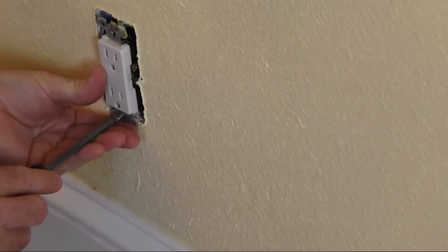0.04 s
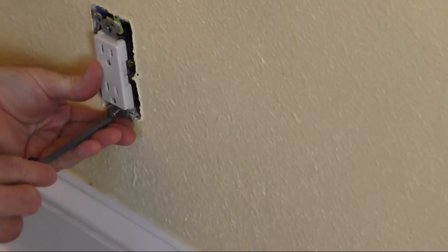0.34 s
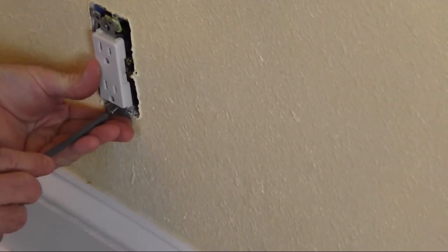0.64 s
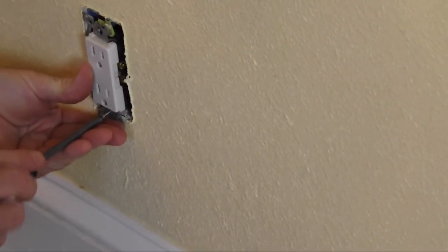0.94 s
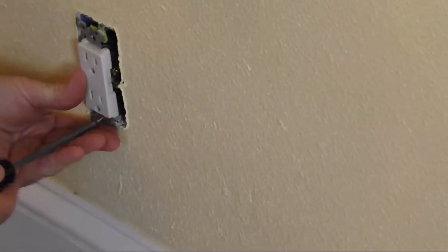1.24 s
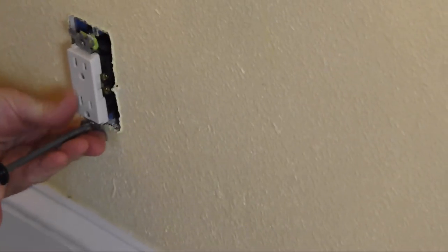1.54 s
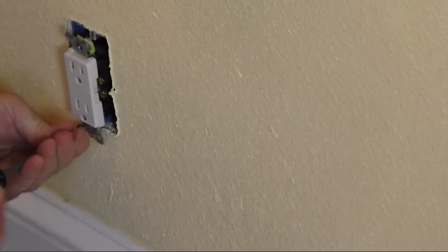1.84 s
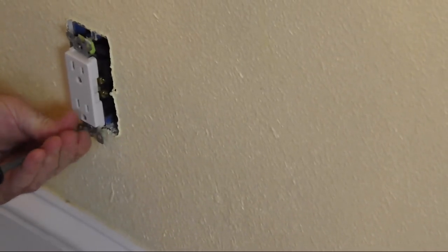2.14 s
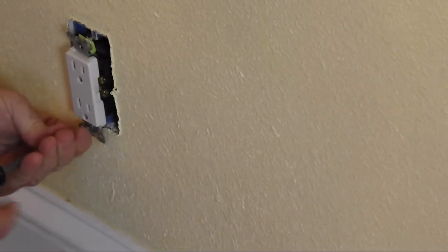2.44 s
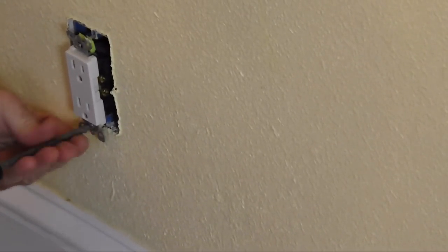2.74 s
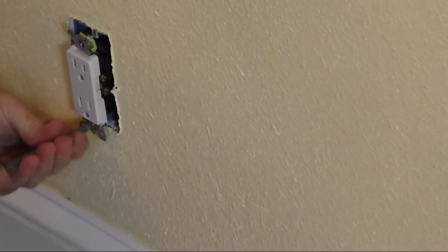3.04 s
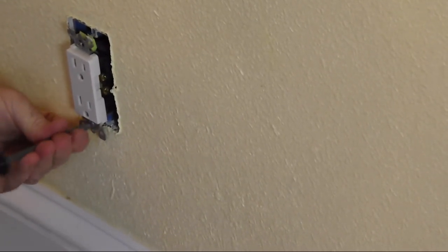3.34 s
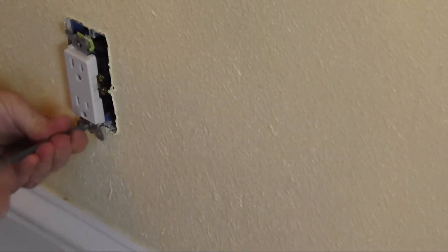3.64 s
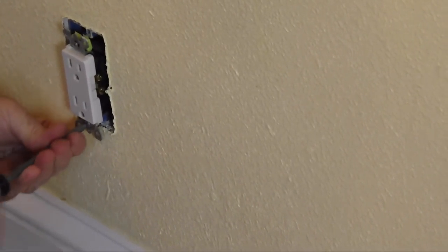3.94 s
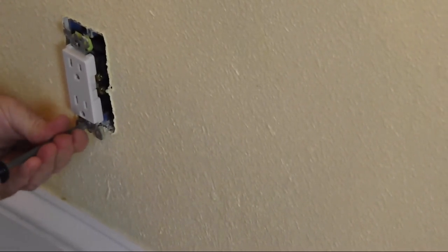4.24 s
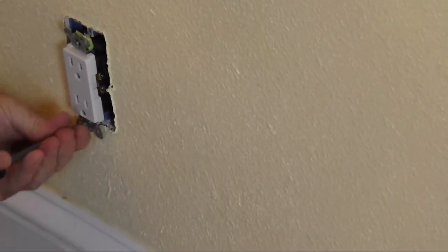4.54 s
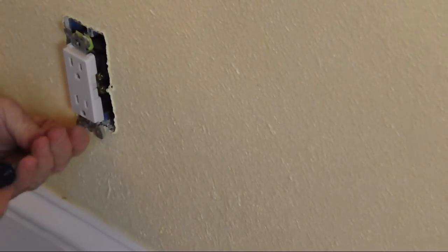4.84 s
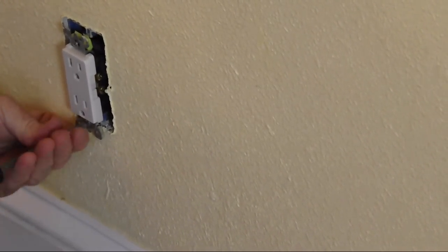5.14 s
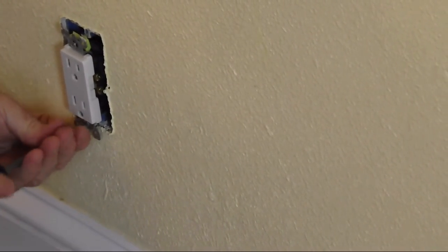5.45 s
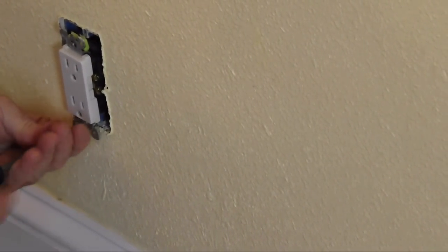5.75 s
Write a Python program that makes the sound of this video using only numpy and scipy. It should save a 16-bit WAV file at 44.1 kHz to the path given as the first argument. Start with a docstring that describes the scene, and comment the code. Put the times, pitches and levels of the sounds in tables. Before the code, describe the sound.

A screwdriver works a wall outlet screw with small clicks, faint scrapes and hollow knocks, then slips with one loud clack.

```python
"""A screwdriver drives the mounting screw of a wall outlet in a small, quiet room.
Room noise and a faint hum run throughout. From the start the loose outlet knocks in its box, the hollow
wall booms behind it and the steel tip clicks in the screw head; each turn scrapes the thread.
At 4.5 s the tool slips hard and jolts the outlet's strap. A few more turns and knocks follow."""
import sys
import numpy as np
from scipy import signal
from scipy.fft import rfft, irfft
from scipy.io import wavfile
from scipy.ndimage import uniform_filter1d

SR = 44100
rng = np.random.default_rng(int(sys.argv[2]) if len(sys.argv) > 2 else 0)


def to_wav(s):
    """Save 16-bit WAV."""
    ch = np.atleast_2d(s).T  # columns
    pcm = np.round(np.clip(ch, -1, 1) * 32767)  # PCM
    wavfile.write(sys.argv[1], SR, pcm.astype(np.int16))


N = 259308

# room noise spectrum: freq_hz, relative_db
NOISE_SPECTRUM = [(12, -31.5), (20, 5), (35, -4), (59, -8), (82, -16), (103, 0.5), (169, -9), (311, -21),
                  (388, -14.5), (484, -20.5), (634, -17), (752, -20.5), (850, -23.5), (1490, -27.5),
                  (5220, -33), (6500, -33.5), (7000, -40), (9100, -67), (15400, -120)]
# hum partials: freq_hz, level_db
HUM_PARTIALS = [(120, -78), (174, -74)]
# reverb decay: freq_hz, t60_s
REVERB_DECAY = [(120, .9), (500, .55), (1000, .5), (2500, 0.62), (6500, 0.36)]
# reverb spectrum: freq_hz, gain_db
REVERB_SPECTRUM = [(170, -14), (260, -13), (400, -8), (800, -10.5), (1080, -11), (1300, -12), (1550, -4),
                   (2300, -13.5), (3400, -14.5), (5000, -19.5), (6500, -16)]
# modes of hollow wall, outlet in its box, steel tip and screw, strap: freq_hz, relative_db, t60_s
WALL_MODES = [(104, -3, .18), (121.6, -3.5, .25), (141, -4, .13), (156, 2, .15), (173, 0, .3),
              (205, -14, .18), (250, -19, .14)]
OUTLET_MODES = [(410.5, 1.5, 0.082), (440, -14, 0.071), (602, -8.5, 0.12), (646.7, -9, 0.16),
                (706.3, -1.5, 0.057), (807, -1.5, 0.037), (893, 0, 0.03), (1037, -11.5, 0.033),
                (1210, -15.5, 0.022), (1516, -17, 0.026), (2380, -15, 0.015)]
STEEL_MODES = [(1470, -10, .02), (2353, -1, .012), (2600, -3, .009), (3325, 0, .011), (3600, 1, .007),
               (3870, -1, .009), (4400, -5, .005), (4700, 0, .008), (4950, 0, .008), (5330, -1, .009),
               (5680, -3, .009), (6200, -5, .006)]
STRAP_MODES = [(352, -19, .2), (388, -11.5, .13), (416, -11, .11), (458, -11, .07), (640, -12, .1),
               (672, 1, .037), (728, -2, .024), (780, -7, .035), (895, -1, .048), (1080, 1, .05),
               (2283, -3, .014)]
# hand leaning on the tool between twists: time_s, rumble_relative_db
HAND_LEAN = [(0, -73.5), (1.6, -60.5), (2.7, -55), (3.2, -52), (4.4, -53.5), (5.88, -56.5)]
# wrist twists: start_s, length_s, rumble_relative_db, scrape_relative_db
WRIST_TWISTS = [(0.187, 0.1, -45, -60.5), (0.413, 0.025, -55, -66), (0.629, 0.028, -41.5, -63.5),
                (0.895, 0.21, -49, -66), (1.191, 0.21, -43, -55.5), (1.735, 0.033, -47.5, -68.5),
                (2.015, 0.15, -47, -60.5), (2.286, 0.1, -45.5, -69.5), (2.498, 0.11, -41, -61),
                (2.917, 0.094, -45, -62.5), (3.323, 0.036, -40, -56), (3.463, 0.04, -42, -61),
                (3.681, 0.052, -44, -67), (3.817, 0.048, -43.5, -61), (4.044, 0.2, -45.5, -63.5),
                (4.448, 0.099, -39.5, -65), (4.743, 0.031, -49, -59.5), (4.979, 0.16, -38, -62.5),
                (5.356, 0.1, -39, -60), (5.586, 0.033, -46, -61), (5.815, 0.021, -41, -65)]
# firm pushes on the wall: start_s, level_db, pitch_hz, swell_s
WALL_PUSHES = [(0.399, -38, 108, 0.0023), (0.95, -42, 123, 0.0043), (1.24, -34.5, 152, 0.014),
               (1.331, -39, 147, 0.0053), (3.095, -42.5, 172, 0.0027), (4.444, -48, 167, 0.027),
               (4.584, -29, 152, 0.013), (4.971, -31.5, 121, 0.021), (5.425, -37, 170, 0.022)]
# tip clicks in the screw head: start_s, relative_db, centre_hz, chatter_s
TIP_CLICKS = [(0.162, -56.5, 2950, 0.011), (0.182, -44.5, 2900, 0.002), (0.1847, -39.5, 2630, 0.00078),
              (0.1855, -38, 3260, 0.0014), (0.1868, -46, 6250, 0.00058), (0.4017, -45.5, 3060, .0015),
              (0.402, -50, 5100, 0.00095), (1.194, -69, 2830, 0.0067), (1.2523, -53, 4320, 0.0013),
              (1.305, -69, 4130, 0.0038), (1.3338, -67, 3570, .005), (1.3436, -58.5, 2650, 0.015),
              (1.355, -56, 4500, 0.0055), (1.364, -36, 3720, 0.00036), (1.3638, -33.5, 5030, 0.00032),
              (1.3646, -41.5, 2260, 0.0039), (1.401, -52.5, 2730, 0.0025), (1.41, -59.5, 4900, 0.0027),
              (1.559, -59.5, 2520, 0.031), (1.74, -61.5, 4700, 0.088), (2.046, -70, 5400, .002),
              (2.108, -65.5, 2720, 0.004), (2.285, -68.5, 3300, .005), (2.51, -67, 4430, 0.0023),
              (2.951, -66, 2380, 0.017), (3.32, -63.5, 2380, 0.043), (3.699, -65, 2340, 0.0098),
              (3.834, -60, 2230, 0.0095), (4.0695, -58.5, 2370, 0.0035), (4.504, -61, 2770, 0.018),
              (4.512, -55.5, 4370, .012), (4.5261, -42, 3730, 0.0065), (4.5265, -44.5, 4130, 0.00086),
              (4.529, -43, 4940, 0.0016), (4.7388, -62.5, 2600, 0.0042)]
# outlet knocks in its box: start_s, outlet_relative_db, wall_db, pitch_hz, scuff_s
OUTLET_KNOCKS = [(0.161, -47, -44.5, 1020, 0.0052), (0.1815, -43, -43, 1050, 0.0005),
                 (0.185, -36, -35, 1130, 0.00071), (0.355, -53, -47, 650, 0.012),
                 (0.398, -44.5, -45, 920, 0.0034), (0.401, -49, -47, 940, 0.0021),
                 (0.618, -60, -43, 910, 0.0048), (0.639, -45, -54, 766, 0.0015),
                 (0.839, -56, -58, 745, 0.003), (0.851, -58, -50.5, 730, .003),
                 (0.9, -52, -47, 780, 0.0064), (0.907, -46.5, -51.5, 800, 0.0025),
                 (0.951, -51, -43.5, 900, 0.0032), (1.036, -57, -53.5, 810, 0.0072),
                 (1.074, -53.5, -44.5, 830, 0.0079), (1.166, -50, -64.5, 850, 0.0081),
                 (1.195, -49, -48, 750, 0.0034), (1.21, -43.5, -44.5, 855, 0.028),
                 (1.247, -60, -41, 790, 0.013), (1.3647, -35, -36.5, 1050, 0.0015),
                 (2.006, -50.5, -48.5, 840, 0.003), (2.102, -44, -34.5, 900, 0.013),
                 (2.287, -53, -62, 664, 0.003), (2.353, -59, -54.5, 810, 0.0034),
                 (2.501, -51, -43.5, 810, 0.0039), (2.517, -52.5, -48, 800, 0.0047),
                 (2.627, -52, -63, 794, 0.0017), (2.642, -59, -51.5, 790, 0.0039),
                 (2.76, -58.5, -60, 910, 0.012), (2.951, -49.5, -44, 800, 0.017),
                 (2.978, -49, -37.5, 725, 0.011), (3.009, -51.5, -51.5, 800, 0.021),
                 (3.095, -50.5, -45, 804, 0.0025), (3.316, -48.5, -44, 800, 0.0093),
                 (3.352, -49.5, -49, 760, 0.0034), (3.408, -61, -59, 800, 0.0016),
                 (3.455, -49.5, -38.5, 815, 0.005), (3.697, -46.5, -50, 880, 0.003),
                 (3.708, -52, -57.5, 850, 0.0045), (3.866, -51, -50, 625, .008),
                 (4.07, -44.5, -64, 760, 0.0039), (4.128, -58, -41, 880, 0.0081),
                 (4.23, -52, -45.5, 680, 0.011), (4.326, -79, -44, 700, .01),
                 (4.956, -43.5, -44, 903, 0.0034), (4.998, -52, -48, 790, .002),
                 (5.008, -53.5, -53, 800, 0.0015), (5.393, -47, -42, 780, 0.004),
                 (5.415, -55, -49, 780, .003), (5.567, -50.5, -49, 700, 0.0081),
                 (5.818, -57.5, -43, 746, .01)]
# strap jolts as the tool slips: start_s, strap_db, wall_db
STRAP_JOLTS = [(4.504, -54, -31), (4.524, -35, -37.5), (4.5286, -21, -20.5), (4.534, -44.5, -30),
               (4.551, -54.5, -40), (4.589, -48, -34.5)]


def amp(db):
    """Decibels to gain."""
    return 10 ** (np.asarray(db) / 20)


def curve_at(points, hz):
    """Table value on a log-frequency axis."""
    freq_hz, value = np.transpose(points)
    return np.interp(np.log(hz + 1), np.log(freq_hz + 1), value)


def shaped_noise(gain_at_hz):
    """Unit-rms noise with the given spectrum."""
    hz = np.fft.rfftfreq(N, 1 / SR)
    noise = irfft(rfft(rng.standard_normal(N)) * gain_at_hz(hz), N)
    return noise / np.sqrt(np.mean(noise ** 2) + 1e-20)


def add(mix, start_s, sound):
    """Mix a sound in at start_s."""
    part = mix[max(round(start_s * SR), 0):][:len(sound)]
    part += sound[:len(part)]


def ring(modes, rise_s, centre_hz=None, width_oct=0.81, detune=0.022):
    """One blow on a set of modes, rising over the contact time; strongest near centre_hz."""
    hz, db, t60_s = np.transpose(modes)[:, :, None]
    scatter_db, shift = rng.standard_normal((2, len(modes), 1))  # no two blows hit the same spot
    hz = hz * (1 + detune * shift)
    t = np.arange(SR // 3) / SR
    coupling = 1 if centre_hz is None else 1 / (1 + (np.log2(hz / centre_hz) / width_oct) ** 2)
    envelopes = coupling * amp(db + scatter_db - 60 * t / t60_s)
    wave = (envelopes * np.sin(2 * np.pi * hz * t)).sum(0)
    wave *= 1 - np.exp(-(t / rise_s) ** 2)
    return wave / np.sqrt(np.sum(wave ** 2) / (SR // 200))  # energy of 5 ms at unit power


def scuff(wave, decay_s, chatter, gritty=False):
    """First contact, then a dying run of micro-slips, all ringing alike; energy preserved."""
    t = np.arange(SR // 12) / SR
    fade = np.exp(-t / decay_s)
    slips = rng.standard_normal(len(t))
    slips = fade * slips * (abs(slips) if gritty else 1)  # gritty: a few slips stand out
    slips *= chatter / np.linalg.norm(slips)
    slips[0] = 1
    for _ in range(3):  # whiten: the run has no pitch of its own
        spectrum = rfft(slips, 8192)
        slips = irfft(spectrum / (abs(spectrum) + 1e-9))[:len(t)] * fade ** 0.15
    out = signal.fftconvolve(slips, wave)
    return out * np.linalg.norm(wave) / np.linalg.norm(out)


def rub(modes, level_db, rise_s, slips_per_s, centre_hz):
    """Stick-slip: many tiny, uneven blows on the same modes, under a level curve."""
    out = np.zeros(N)
    for _ in range(4):
        slips = rng.standard_normal(N) * (rng.random(N) < slips_per_s / (4 * SR))
        out += signal.oaconvolve(slips, ring(modes, rise_s, centre_hz))[:N]
    local_power = abs(uniform_filter1d(out ** 2, SR // 16))
    return amp(level_db) * out / np.sqrt(local_power + 0.05 * np.mean(out ** 2))


def background(noise_db=-61.5, waver_rad=0.88, drift_hz=3):
    """Steady room noise and a faint, wavering hum."""
    t = np.arange(N) / SR
    noise = shaped_noise(lambda hz: amp(curve_at(NOISE_SPECTRUM, hz)))
    drift_rad = waver_rad * shaped_noise(lambda hz: hz < drift_hz)
    hum = sum(amp(db) * np.sqrt(2) * np.sin(2 * np.pi * hz * t + drift_rad) for hz, db in HUM_PARTIALS)
    return amp(noise_db) * noise + hum


def reverb(source, predelay_s=0.002, early_boost=2.0, early_s=0.016):
    """Close floor and corner reflections, then a dense tail; each band decays at its own rate."""
    t = np.arange(SR) / SR
    taps = rng.choice([-1., 1.], SR) * (rng.random(SR) < 1 / 12) * (t > predelay_s)
    reflections = taps * (1 + early_boost * np.exp(-t / early_s))
    hz, frame_s, bands = signal.stft(reflections, SR, nperseg=512)
    t60_s = curve_at(REVERB_DECAY, hz)[:, None]
    energy_norm = np.sqrt(2 * np.log(1000) / t60_s / np.sum(taps ** 2))
    bands *= energy_norm * amp(curve_at(REVERB_SPECTRUM, hz)[:, None] - 60 * frame_s / t60_s)
    response = signal.istft(bands, SR, nperseg=512)[1]
    return signal.fftconvolve(source, response)[:N]


def twist(t, length_s, grip_s, ease_db_per_s=16.5, release_s=0.022):
    """Envelope of one twist, peak at t = 0: grip, easing hold, release."""
    grip = np.exp(np.minimum(t, 0) / grip_s)
    hold = amp(-ease_db_per_s * np.clip(t, 0, length_s))
    release = np.exp(-np.maximum(t - length_s, 0) / release_s)
    return grip * hold * release


def hand_pressure(tremor_db=3.8, tremor_hz=9, thread_share_db=-29.5):
    """Wall and thread level curves in dB: twists over the unsteady lean of the hand."""
    t = np.arange(N) / SR
    tremor = shaped_noise(lambda hz: hz < tremor_hz)
    wall = amp(np.interp(t, *np.transpose(HAND_LEAN)) + tremor_db * tremor)
    thread = wall * amp(thread_share_db)
    for start_s, length_s, wall_db, thread_db in WRIST_TWISTS:
        wall = np.maximum(wall, amp(wall_db) * twist(t - start_s, length_s, grip_s=0.018))
        thread = np.maximum(thread, amp(thread_db) * twist(t - start_s, length_s, grip_s=0.019))
    return 20 * np.log10(wall), 20 * np.log10(thread)


def screw_turning():
    """The wall rumbles under the hand; the thread scrapes through the strap, catching on burrs."""
    wall_db, thread_db = hand_pressure()
    rumble = rub(WALL_MODES, wall_db - 7, rise_s=0.0027, slips_per_s=700, centre_hz=144)
    scrape = rub(OUTLET_MODES, thread_db - 1, rise_s=0.00071, slips_per_s=300, centre_hz=583)
    grit = rub(STEEL_MODES, thread_db - 17, rise_s=0.0002, slips_per_s=350, centre_hz=3100)
    return rumble + scrape + grit


def wall_heaves():
    """A push builds slowly; the wall swings mostly in one mode."""
    out = np.zeros(N)
    for start_s, level_db, pitch_hz, swell_s in WALL_PUSHES:
        swing = ring(WALL_MODES, rise_s=swell_s, centre_hz=pitch_hz, width_oct=0.16)
        add(out, start_s, amp(level_db) * swing)
    return out


def tip_clicks(gain_db=-3):
    """The tip skids over the slot edge: a snap and short chatter ring the steel."""
    out = np.zeros(N)
    for start_s, relative_db, centre_hz, chatter_s in TIP_CLICKS:
        tick = ring(STEEL_MODES, rise_s=0.0005, centre_hz=centre_hz, width_oct=0.21, detune=0.006)
        skid = scuff(tick, chatter_s, chatter=1 + chatter_s / 0.008)  # long skid: no clear first snap
        add(out, start_s, amp(relative_db + gain_db) * skid)
    return out


def outlet_knocks(outlet_gain_db=-1, tip_db=-24, wall_lag_s=0.00094):
    """Each knock rings the outlet, jogs the tip in the screw, then pushes the wall."""
    out = np.zeros(N)
    for start_s, outlet_db, wall_db, pitch_hz, scuff_s in OUTLET_KNOCKS:
        body = ring(OUTLET_MODES, rise_s=0.001, centre_hz=pitch_hz, width_oct=0.43)
        tip = ring(STEEL_MODES, rise_s=0.0001, centre_hz=2700)
        knock = scuff(body + amp(tip_db) * tip, scuff_s, chatter=1.2, gritty=True)
        add(out, start_s, amp(outlet_db + outlet_gain_db) * knock)
        add(out, start_s + wall_lag_s, -amp(wall_db) * ring(WALL_MODES, rise_s=0.0024))
    return out


def strap_jolts(wall_lag_s=0.0021, mode_gap_hz=(1230, 1850)):
    """The steel strap slaps down, rattles, rebounds and settles, thumping the wall each time."""
    out = np.zeros(N)
    notch = signal.butter(2, mode_gap_hz, "bandstop", fs=SR, output="sos")
    for start_s, strap_db, wall_db in STRAP_JOLTS:
        strap = ring(STRAP_MODES, rise_s=0.0008, detune=0.005)
        slap = scuff(strap, decay_s=0.0018, chatter=0.4)
        thump = ring(WALL_MODES, rise_s=0.0011, centre_hz=130, width_oct=0.65)
        add(out, start_s, amp(strap_db) * signal.sosfilt(notch, slap))
        add(out, start_s + wall_lag_s, -amp(wall_db) * thump)
    return out


def scene(radiation_hz=76):
    """Work at the outlet, reverb and background; the wall radiates little below its lowest mode."""
    work = outlet_knocks() + strap_jolts() + wall_heaves() + tip_clicks() + screw_turning()
    highpass = signal.butter(4, radiation_hz, "highpass", fs=SR, output="sos")
    work = signal.sosfilt(highpass, work)
    return (work + reverb(work) + background())[None]


def record(dry, cutoff_hz=7150):
    """Small microphone with a steep band limit."""
    lowpass = signal.firwin(511, cutoff_hz, window=("kaiser", 8), fs=SR)
    return signal.oaconvolve(dry, lowpass[None], "same")


dry = scene()
out = record(dry)
to_wav(out)
```